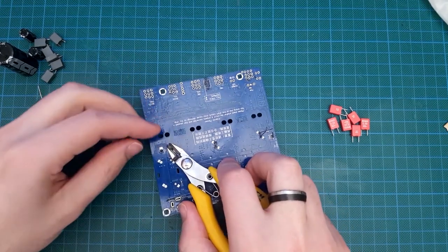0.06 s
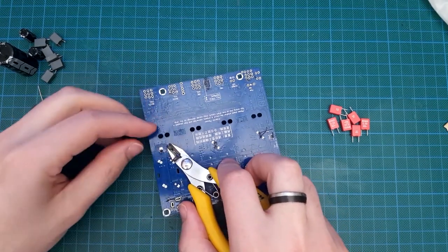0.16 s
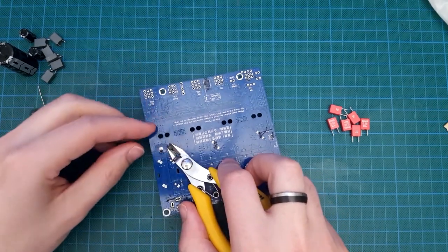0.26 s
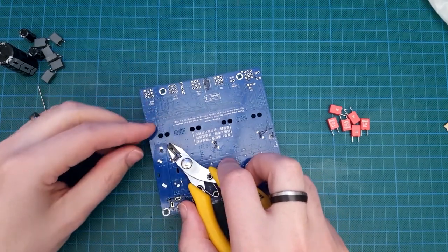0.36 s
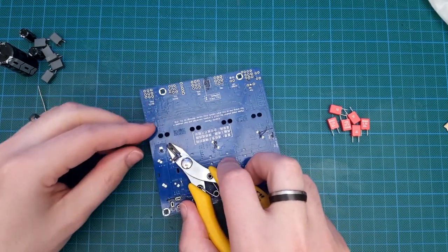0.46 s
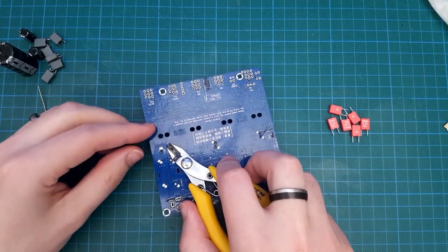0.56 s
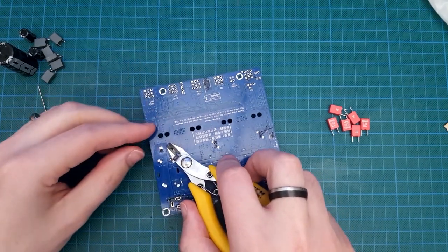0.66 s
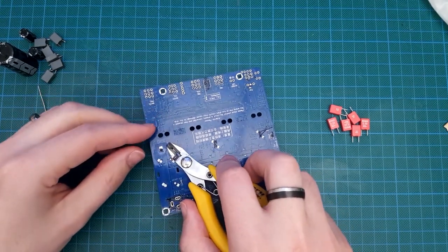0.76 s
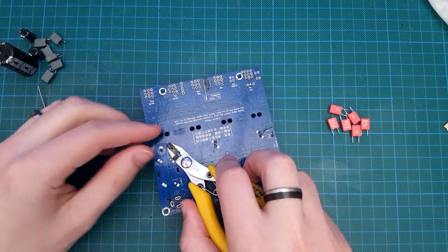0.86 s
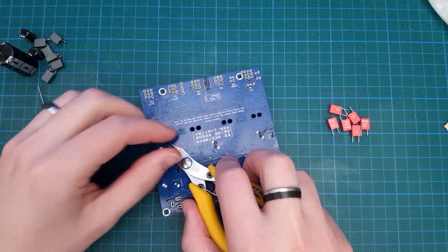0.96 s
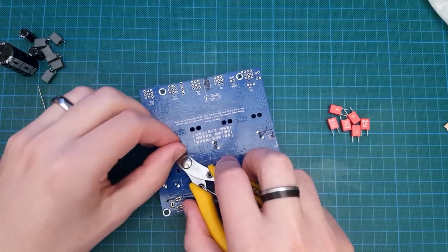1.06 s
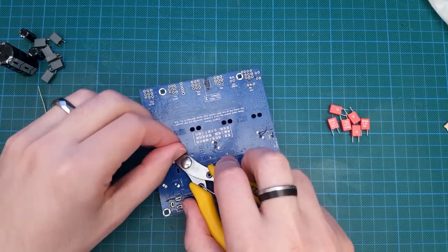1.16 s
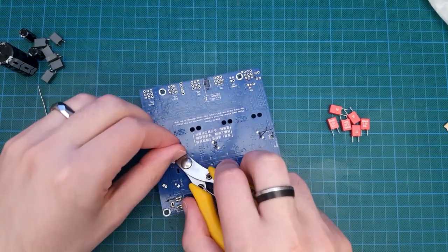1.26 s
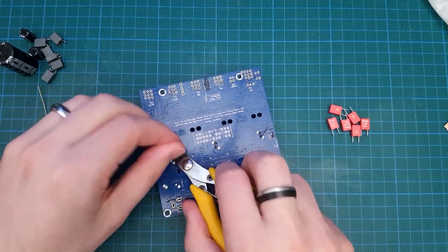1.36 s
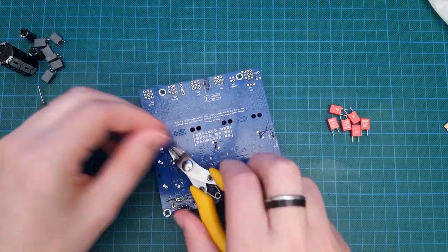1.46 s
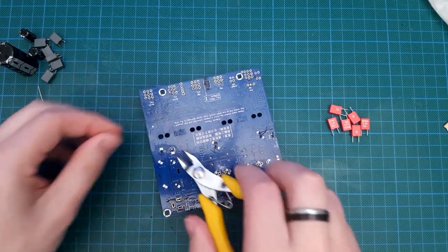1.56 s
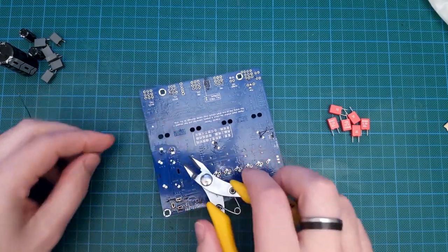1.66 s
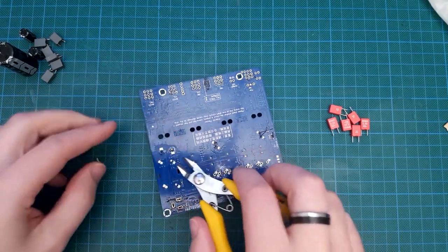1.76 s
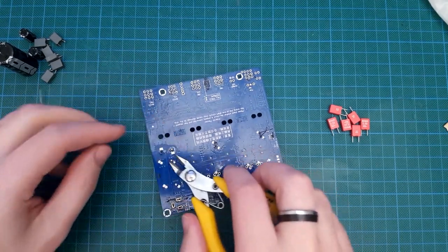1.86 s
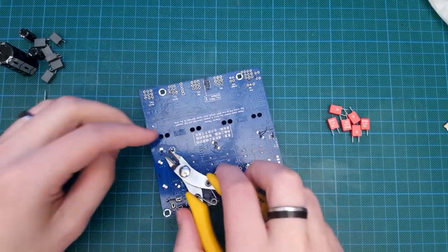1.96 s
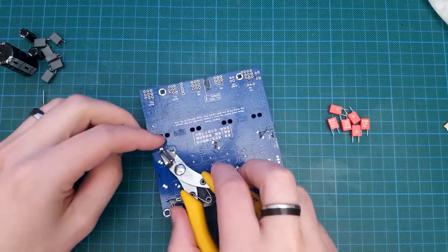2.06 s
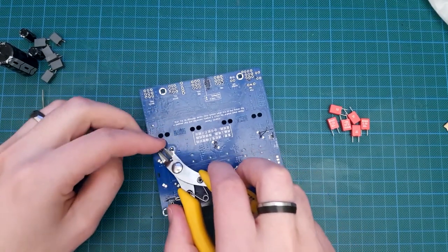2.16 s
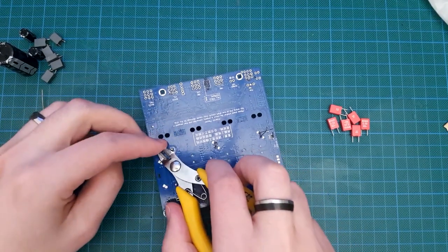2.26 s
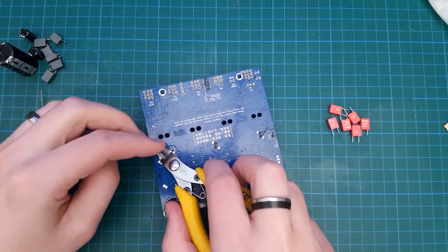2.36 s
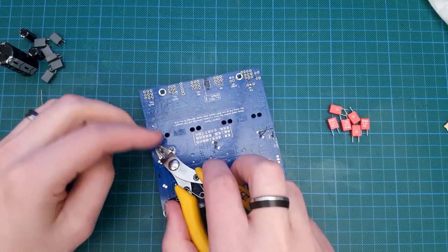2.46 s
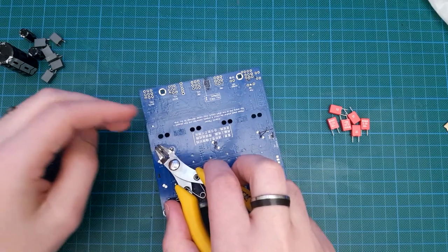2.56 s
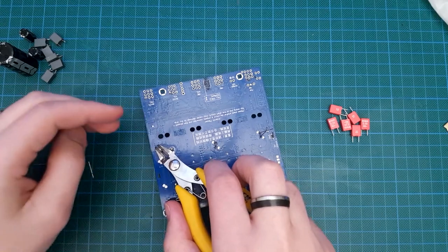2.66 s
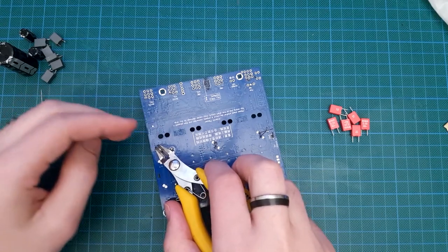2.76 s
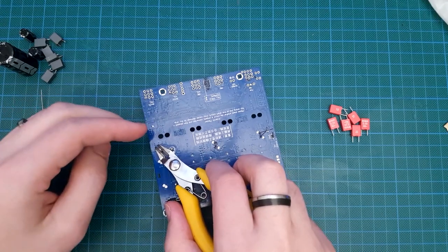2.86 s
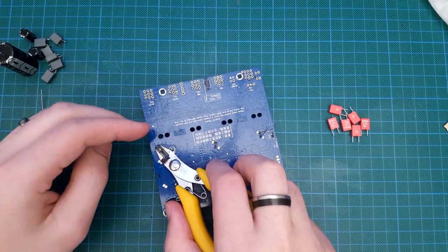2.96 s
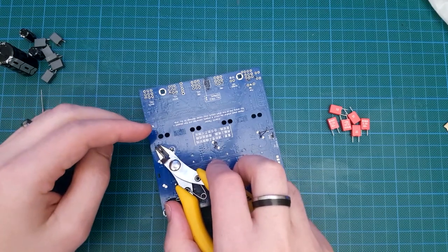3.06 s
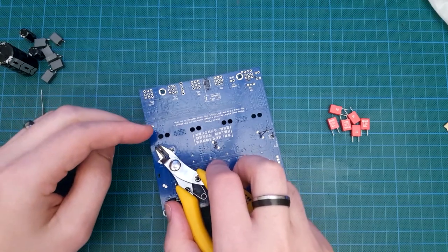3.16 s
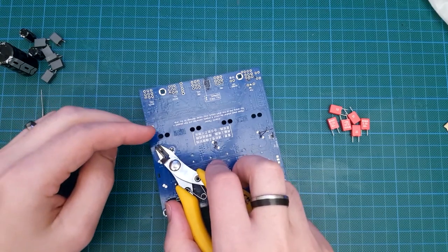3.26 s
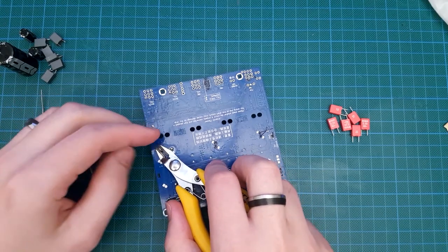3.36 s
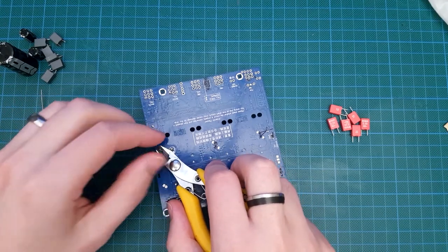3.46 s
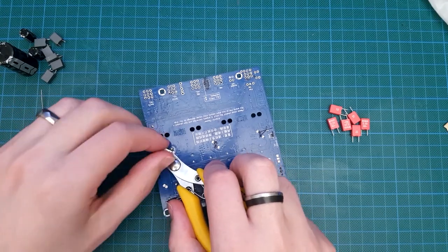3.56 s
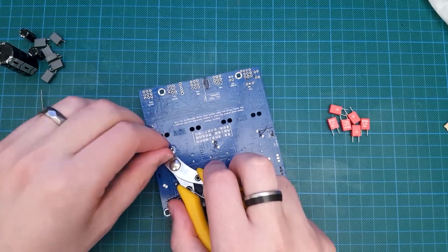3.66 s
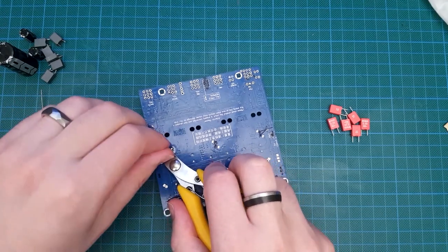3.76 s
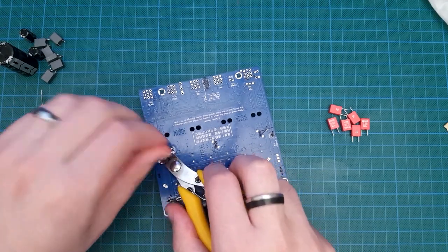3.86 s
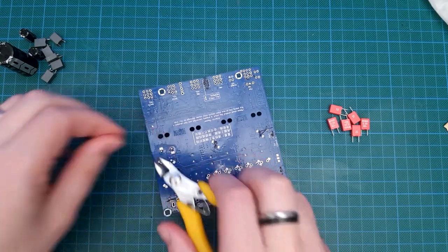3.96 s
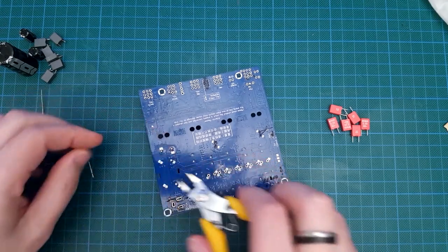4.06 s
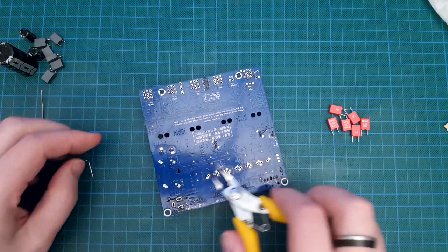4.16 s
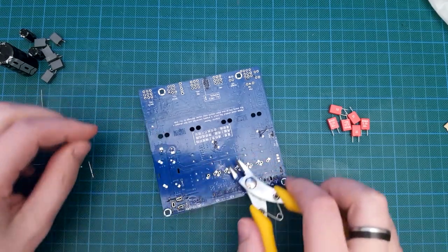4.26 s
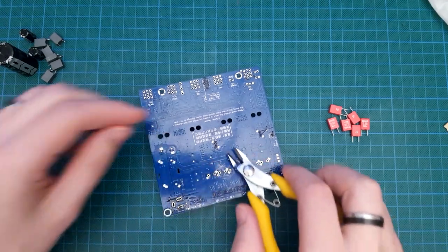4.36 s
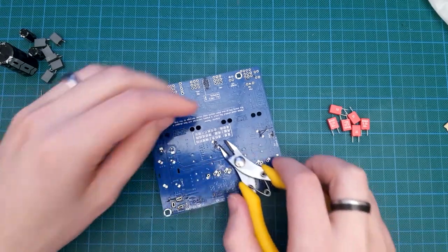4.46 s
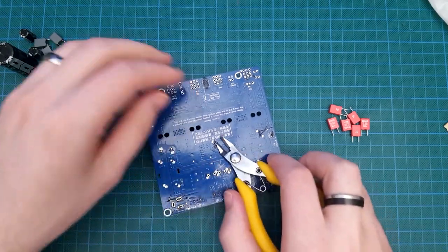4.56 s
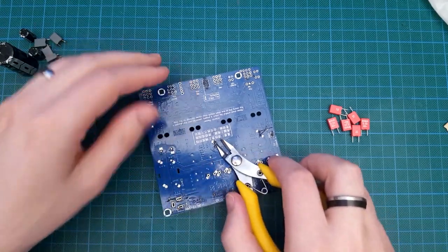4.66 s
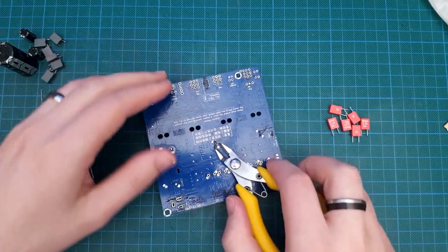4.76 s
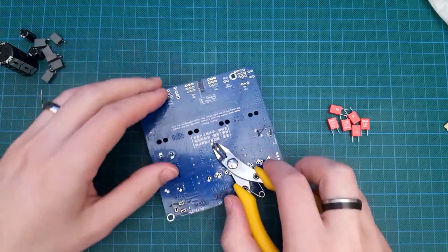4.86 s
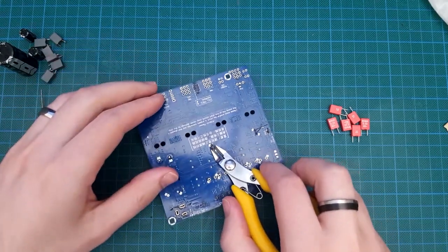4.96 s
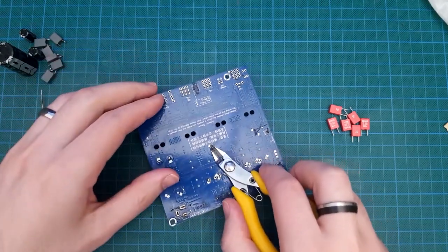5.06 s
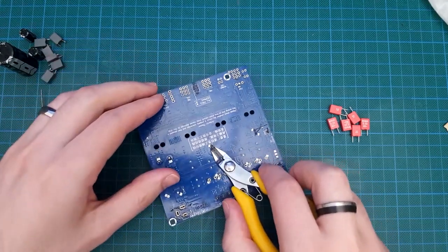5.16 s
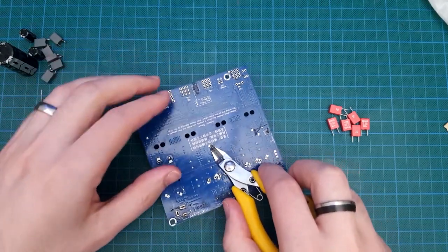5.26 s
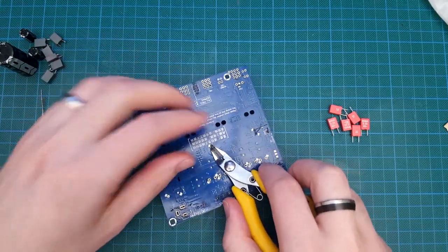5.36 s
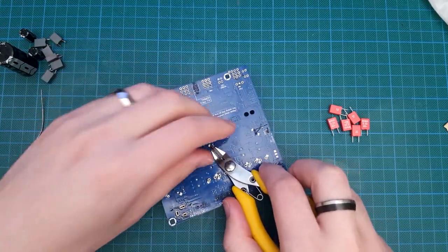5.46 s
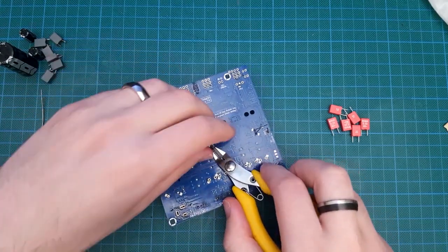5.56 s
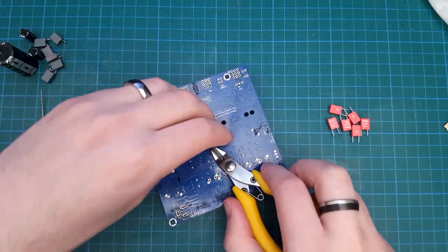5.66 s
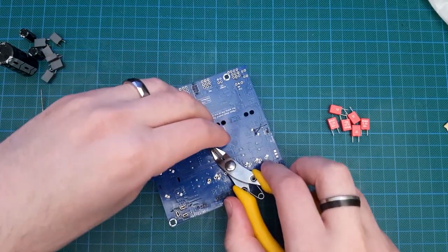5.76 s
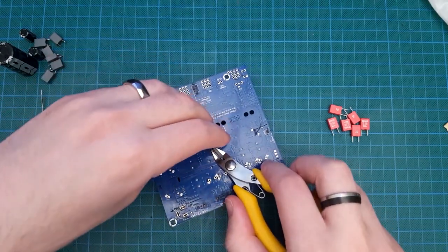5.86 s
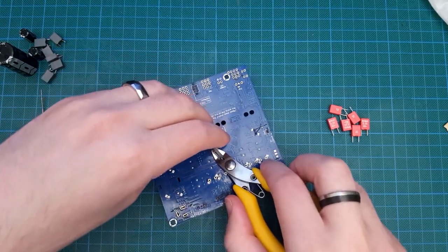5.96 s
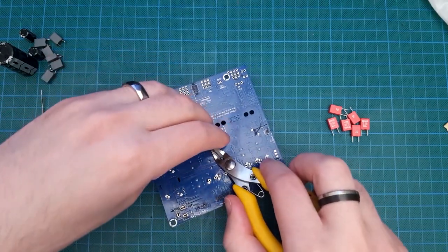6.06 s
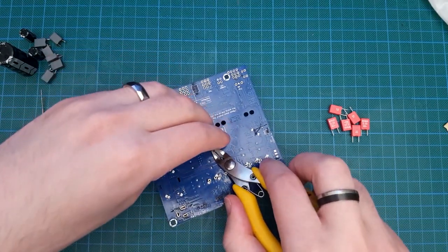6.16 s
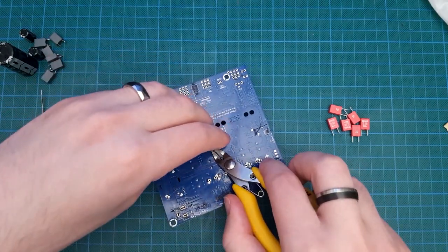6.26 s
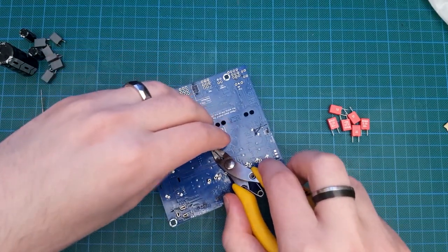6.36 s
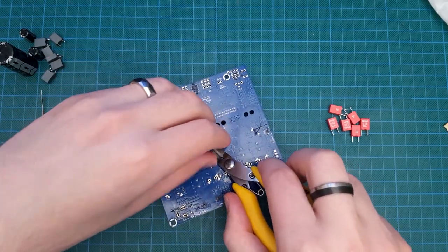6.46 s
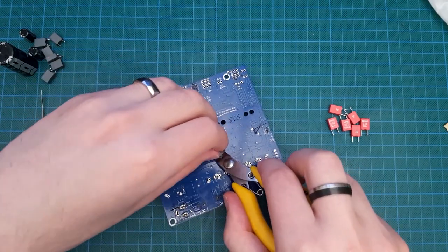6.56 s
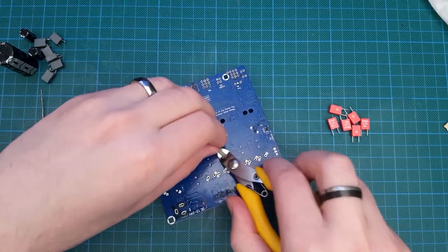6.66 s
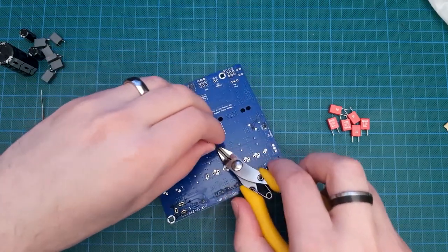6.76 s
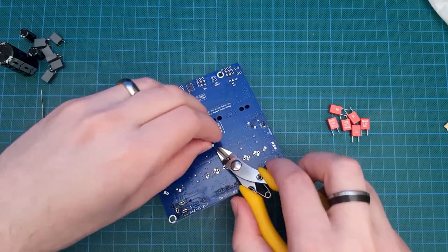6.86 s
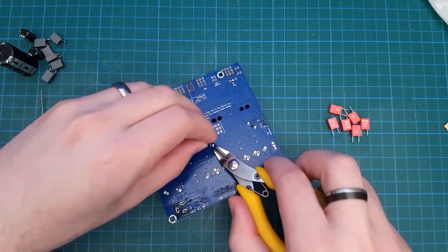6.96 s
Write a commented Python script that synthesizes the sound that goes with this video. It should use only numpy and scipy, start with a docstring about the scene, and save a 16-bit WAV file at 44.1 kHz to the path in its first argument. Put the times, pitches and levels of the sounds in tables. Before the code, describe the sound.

Three hard metallic snaps of small cutters through component leads, with light knocks, ticks and brief rattles between, over faint room rumble and hiss.

```python
"""Three hard snaps with knocks, ticks and brief rattles between them: flush cutters snip component leads off a
circuit board on a workbench in a small room, over a low rumble and a faint hiss.
Blows sum damped modes of bench, board, jaws and touched spot with a noise burst; snaps add a dense noise tail.
Rattles and scrapes are runs of tiny blows; the room is decaying band noise, rumble and hiss are coloured noise."""
import sys
import numpy as np
from scipy import signal
from scipy.fft import rfft, irfft
from scipy.io import wavfile

SR = 44100
rng = np.random.default_rng(int(sys.argv[2]) if len(sys.argv) > 2 else 0)


def persist_wave(psi):
    """Save psi, clipped to +-1, as 16-bit WAV."""
    counts = np.round(np.clip(psi, -1, 1) * 32767).astype(np.int16)
    wavfile.write(sys.argv[1], SR, np.atleast_2d(counts).T)


N = 309141
HIT_SAMPLES = 2048   # length of one blow
SPOT_WIDTH_HZ = 240   # resonance width of the touched spot, damped by fingers


def from_db(db):
    """Decibels to gain."""
    return 10 ** (np.asarray(db) / 20)


def unit(x):
    """Scale to energy 1 per channel."""
    return x / np.sqrt(np.sum(x ** 2, axis=-1, keepdims=True) + 1e-20)


def pan(left_minus_right_db):
    """Left and right gains for a level difference."""
    return from_db(np.array([[left_minus_right_db], [-left_minus_right_db]]) / 2)


def at_hz(points, hz):
    """Read a table on a log-frequency axis."""
    f_hz, value = np.transpose(points)
    return np.interp(np.log(np.maximum(hz, 1)), np.log(f_hz), value)


def in_time(rows):
    """Read a curve at every sample."""
    return np.interp(np.arange(N) / SR, *np.transpose(rows))


def coloured(x, spectrum):
    """Filter a noise by a spectrum table."""
    size = x.shape[-1]
    bins_hz = np.arange(size // 2 + 1) * SR / size
    return irfft(rfft(x) * from_db(at_hz(spectrum, bins_hz)), size)


def high_pass(x, hz):
    """Second-order bass cut."""
    return signal.sosfilt(signal.butter(2, hz, "high", fs=SR, output="sos"), x)


def stereo(shared, opposed, likeness):
    """Left and right from two noises; likeness is their correlation."""
    return np.sqrt(1 + likeness) * shared + np.sqrt(1 - likeness) * opposed * [[1], [-1]]


def add(out, s, sound):
    """Mix a short sound in at a time."""
    at = int(np.clip(s * SR, 0, N - 1))
    out[:, at:at + sound.shape[1]] += sound[:, :N - at]


def background(spectrum, level_db, likeness):
    """Coloured noise with a slow level curve, partly shared by the two channels."""
    mid, side = unit(coloured(rng.standard_normal((2, N)), spectrum)) * np.sqrt(N / 2)
    return from_db(in_time(level_db)) * stereo(mid, side, likeness)


def room_rumble():
    """Low noise, nearly alike in both channels, with a drifting level."""
    # t/s, level/dB before the layer gain
    rumble_level = [(0.0, -65), (0.58, -63.5), (2.73, -68), (3.81, -64), (4.71, -75.5), (5.04, -78),
                    (5.46, -73), (5.78, -67.5), (7.01, -63.5)]
    # f/Hz, spectral density/dB
    rumble_spectrum = [(20, -31), (55, -26.5), (70, -15), (88, -5), (130, -0.5), (200, 2), (280, -0.5),
                       (380, -14), (700, -16), (1500, -54)]
    return from_db(1.5) * pan(1.8) * background(rumble_spectrum, rumble_level, likeness=.92)


def faint_hiss():
    """Wider noise with a slightly drifting level."""
    # t/s, level/dB before the layer gain
    hiss_level = [(0, -69), (1.2, -69), (2.6, -72), (4.2, -70.5), (7.0, -71.5)]
    # f/Hz, spectral density/dB
    hiss_spectrum = [(150, -12.5), (400, 4.5), (700, 2), (1100, -4), (2000, -7), (4000, -18.5), (8000, -28),
                     (11000, -24.5), (15000, -20.5)]
    return from_db(-0.95) * pan(0.43) * background(hiss_spectrum, hiss_level, likeness=.55)


def room(x, build_s):
    """Diffuse reflections reach both channels from both sides, build up quickly and die band by band."""
    # spectral density of the reflections: f/Hz, level/dB
    room_level = [(200, -4.5), (700, 0.5), (1300, -5.5), (2000, -11), (3200, -8), (5000, -7.5), (9000, -4),
                  (16000, -7.5)]
    # decay: f/Hz, T60/s
    room_t60 = [(300, 0.13), (1200, 0.2), (3000, 0.2), (6000, 0.34), (10000, 0.21), (16000, 0.32)]
    # f/Hz, left minus right/dB
    room_pan = [(600, -1), (2000, 0), (4000, 4.5), (8000, -2), (14000, -3.5)]
    # f/Hz, left-right correlation
    room_likeness = [(300, .7), (700, 0.3), (2000, 0), (4000, .1), (10000, 0)]
    t = np.arange(SR // 2) / SR
    build = 1 - np.exp(-(t / build_s) ** 2)
    edges_hz = np.geomspace(150, 18000, 15)
    tail = 0
    for low, high in zip(edges_hz, edges_hz[1:]):
        hz = np.sqrt(low * high)
        band = signal.butter(2, [low, high], "band", fs=SR, output="sos")
        noise = signal.sosfilt(band, rng.standard_normal((2, 2, len(t))))
        noise = stereo(noise[:, :1], noise[:, 1:], at_hz(room_likeness, hz))   # input side, channel, time
        fade = from_db(-60 * t / at_hz(room_t60, hz)) * build
        gain = np.sqrt((high - low) / SR) * from_db(at_hz(room_level, hz))
        tail = tail + unit(noise * fade) * gain * pan(at_hz(room_pan, hz))
    return signal.fftconvolve(x[:, None], tail, axes=-1).sum(axis=0)[:, :N]


def ring(modes, detune, phase_spread, rise_s, lead_s=0, size=HIT_SAMPLES):
    """Damped modes; the point of contact and the grip change their strength and pitch from blow to blow."""
    t = np.arange(size) / SR
    rise = 1 - np.exp(-(t / rise_s) ** 2)   # the force takes a moment to build
    out = 0
    for hz, width_hz, db in modes:
        strength, stretch, left, right = rng.standard_normal(4)
        channel_t = t + [[0], [lead_s]]   # right channel leads
        phase = 2 * np.pi * hz * (1 + detune * stretch) * channel_t
        phase = phase + phase_spread * np.array([[left], [right]])
        mode = unit(np.sin(phase) * rise * np.exp(-np.pi * width_hz * t))
        # neighbouring modes swing in opposite directions
        out = from_db(db + 2 * strength) * mode - out
    return out


def contact(hz, thud_db, clack_db, clink_db, crack_db, ring_db, ring_width_hz, crack_s, rebound):
    """One blow: bench, board, jaws and the touched spot ring under a burst of noise; the tool rebounds once."""
    # resonances: f/Hz, width/Hz, level/dB
    bench_modes = [(370, 260, -9), (446, 330, -1), (564, 30, -7), (626, 59, -1), (777, 47, -4.5),
                   (879, 30.7, -2.5), (1025, 340, -4.5)]
    board_modes = [(1328, 160, -5.5), (1600, 370, -11), (1846, 84, 0.5), (1943, 84, 0), (2220, 67, -1.5)]
    jaw_modes = [(3060, 430, 2), (3570, 970, 4.5), (4000, 1600, -7.5), (4350, 240, -4.5), (4980, 520, -4)]
    # colour of the fracture: f/Hz, spectral density/dB
    crack_spectrum = [(3500, -23.5), (5500, 0), (7000, -3.5), (8000, -3.5), (9400, 0.5), (11000, -1),
                      (13000, -4.5), (16000, -8.5)]
    thud = ring(bench_modes, detune=.008, phase_spread=.3, rise_s=.001)
    clack = ring(board_modes, detune=.015, phase_spread=.25, rise_s=.0005, lead_s=3.6e-5)
    clink = ring(jaw_modes, detune=.02, phase_spread=1.3, rise_s=.0004)
    spot = ring([(hz, ring_width_hz, 0)], detune=0, phase_spread=.2, rise_s=.0005, lead_s=3.6e-5)
    t = np.arange(HIT_SAMPLES) / SR
    burst = (1 - np.exp(-t / 0.0005)) * np.exp(-t / crack_s)
    crack = coloured(rng.standard_normal((2, HIT_SAMPLES)), crack_spectrum) * burst

    parts = np.array([clack, clink, spot, crack])
    lag = int(SR * rng.uniform(.0024, 0.0044))
    second = np.pad(parts, ((0, 0), (0, 0), (lag, 0)))[..., :HIT_SAMPLES]
    parts = unit(parts + rebound * second)
    spot_db = max(clack_db, clink_db) + ring_db
    gains = [from_db(clack_db) * pan(3), from_db(clink_db) * pan(11.5),
             from_db(spot_db) * pan(3), from_db(crack_db) * pan(-7.5)]
    # the small board and jaws radiate little bass
    bright = high_pass(sum(parts * np.array(gains)), hz=1099.0)
    return bright + from_db(thud_db) * pan(-3) * high_pass(unit(thud), hz=260)


def jaw_rings():
    """Released by the grip, the hardened steel sings faintly for a moment."""
    # t/s, level/dB before the layer gain
    release_rows = [(3.718, -36), (4.83, -50.5), (6.838, -25.5), (6.978, -63.5)]
    # steel modes: f/Hz, width/Hz, level/dB
    steel_modes = [(2960, 12, -7), (4300, 21, -1.5), (5172, 21.5, -9.5), (8570, 12.7, -8), (11500, 23, -10)]
    out = np.zeros((2, N))
    for s, db in release_rows:
        song = ring(steel_modes, detune=0.0014, phase_spread=0.9, rise_s=.001, size=SR // 4)
        add(out, s, from_db(db + 4.5) * song)
    return out


def rattle(start, end, per_s, hz, fade_db, clack_db, clink_db, crack_db, ring_db):
    """An uneven run of tiny ticks that fades or swells as it goes."""
    out = np.zeros((2, N))
    for s in np.arange(start, end, 1 / per_s):
        late, stretch, force = rng.uniform(-1, 1, 3)
        tick = contact(hz * (1 + .08 * stretch), clack_db - 27, clack_db, clink_db, crack_db,
                       ring_db=ring_db, ring_width_hz=SPOT_WIDTH_HZ, crack_s=.003, rebound=.6)
        tick_db = 3.7 * force - fade_db * (s - start) / (end - start)
        add(out, s + 0.69 * late / per_s, from_db(tick_db) * tick)
    return out


def scrapes():
    """The jaws stick and slip over the solder joints, swelling as they go."""
    # start/s, end/s, mean slip rate/Hz, ring f/Hz, level/dB
    scrape_rows = [(1.588, 1.616, 390, 3560, -56), (1.997, 2.15, 90, 3440, -62.5),
                   (6.606, 6.640, 130, 2020, -38)]
    out = np.zeros((2, N))
    for start, end, per_s, hz, db in scrape_rows:
        out += from_db(db) * rattle(start, end, per_s, hz, fade_db=-6,
                                    clack_db=3, clink_db=-4, crack_db=-20, ring_db=6.5)
    return out


def drops(count=4):
    """A clipped lead lands on the bench in ever shorter, weaker hops while a fading rattle rolls to rest."""
    # t/s, level/dB before layer gains, first hop/s, roll duration/s
    drop_rows = [(1.728, -31.5, .0475, .2), (4.138, -34, .0225, .085)]
    hop_share, hop_loss_db = 0.51, 7.5   # each hop against the one before
    roll_hz, roll_per_s = 2970, 130
    out = np.zeros((2, N))
    for s, db, hop_s, rest_s in drop_rows:
        roll = rattle(s, s + rest_s, roll_per_s, roll_hz, fade_db=7,
                      clack_db=-9, clink_db=3, crack_db=-22, ring_db=1.5)
        out += from_db(db - 12) * roll
        for k in range(count):
            landing = contact(roll_hz, thud_db=-49, clack_db=-19.5, clink_db=-10, crack_db=-13.5,
                              ring_db=-5.5, ring_width_hz=SPOT_WIDTH_HZ, crack_s=0.0039, rebound=0.57)
            add(out, s, from_db(db - hop_loss_db * k + 18.5) * landing)
            s = s + hop_s * hop_share ** k
    return out


def ticks():
    """The jaw tips feel for the next lead: light, bright touches."""
    # t/s, level/dB before the layer gain, ring f/Hz
    tick_rows = [(0.0483, -58, 3070), (0.329, -66, 4400), (0.922, -57.5, 2170), (1.603, -42.5, 2560),
                 (1.7121, -40.5, 2360), (4.4723, -45, 2820), (4.6564, -58, 4380), (6.7032, -29, 2300),
                 (6.978, -45, 4310)]
    out = np.zeros((2, N))
    for s, db, hz in tick_rows:
        touch = contact(hz, thud_db=-29.5, clack_db=-14, clink_db=-12, crack_db=-18,
                        ring_db=4.0, ring_width_hz=81, crack_s=0.0052, rebound=.6)
        add(out, s, from_db(db + 19) * touch)
    return out


def knocks():
    """The tool is set down on the board; each knock has its own share of low thud and bright crack."""
    # t/s, level/dB before the layer gain, touched spot f/Hz, relative thud/dB, relative crack/dB
    knock_rows = [(1.3503, -25.5, 1960, -35, -29), (1.3829, -23, 2040, -41, -50),
                  (1.4048, -34.5, 1800, -35, -48), (2.0727, -30, 2070, -17, -39),
                  (2.162, -22, 2080, -23.5, -28.5), (2.1991, -39, 1840, -29, -42),
                  (2.2625, -48, 1970, -25, -35), (4.4896, -12.5, 2436, -37.5, -24.5),
                  (4.7272, -18, 2460, -40.5, -28.5), (4.8307, -38, 1304, -30, -27),
                  (5.4272, -46, 1660, -14, -33), (6.5913, -33.5, 1980, -32, -38),
                  (6.6465, -15, 2110, -33, -27), (6.837, -11.5, 2300, -33, -29.5)]
    out = np.zeros((2, N))
    for s, db, hz, thud_db, crack_db in knock_rows:
        blow = contact(hz, thud_db, clack_db=-10.5, clink_db=-20, crack_db=crack_db,
                       ring_db=0.0, ring_width_hz=SPOT_WIDTH_HZ, crack_s=0.0034, rebound=0.43)
        add(out, s, from_db(db + 17) * blow)
    return out


def shiver(t60):
    """A hard snap shakes the whole board and its parts: resonances so dense that they merge into noise."""
    # f/Hz, spectral density/dB
    shiver_spectrum = [(200, -26), (400, -2.5), (750, 0.5), (1100, -3.5), (1800, -3), (3200, 1),
                       (6500, -8.5), (10000, -3), (16000, -6.5)]
    t = np.arange(SR // 3) / SR
    fade = (1 - np.exp(-t / 0.00082)) * from_db(-60 * t / t60)
    return unit(coloured(rng.standard_normal((2, len(t))), shiver_spectrum) * fade)


def snips():
    """A lead starts to tear, gives way, and the jaws slam shut; a sharper crack makes the board shiver more."""
    # t/s, level/dB before part gains, main ring f/Hz, bench knock f/Hz,
    # then relative bench thud/dB, board clack/dB, jaw clink/dB, steel crack/dB
    snip_rows = [(1.2293, -6, 1878, 454, -33, -7.5, -16.5, -23),
                 (3.717, -4.5, 2010, 648, -24, -12.5, -13.5, -11),
                 (6.4812, -9.5, 2300, 595, -31.5, -12.5, -15.5, -18.5)]
    out = np.zeros((2, N))
    for s, db, hz, knock_hz, thud_db, clack_db, clink_db, crack_db in snip_rows:
        tear = contact(hz, thud_db, clack_db, clink_db, crack_db,
                       ring_db=-5.5, ring_width_hz=350, crack_s=.002, rebound=.3)
        blow = contact(hz, thud_db - 0.5, clack_db, clink_db, crack_db,
                       ring_db=-3, ring_width_hz=370, crack_s=.0014, rebound=.35)
        # the board kicks the bench at a different place for each lead
        knock = ring([(knock_hz, 110, 0)], detune=0, phase_spread=0.69, rise_s=.001)
        add(out, s - .003, from_db(db - 7.5) * tear)
        add(out, s, from_db(db + 24.0) * blow)
        add(out, s, from_db(db - 7.5) * high_pass(knock, hz=263))
        add(out, s, from_db(db + crack_db + 20) * shiver(t60=0.23))
    return out


def scene():
    """The cutters close by, the room around them."""
    underneath = room_rumble() + faint_hiss()
    handling = jaw_rings() + scrapes() + drops() + ticks() + knocks()
    cuts = snips()
    reflections = room(from_db(-1.0) * cuts + from_db(-2) * handling, build_s=0.0071)
    return cuts + handling + reflections + underneath


def record(dry):
    """The highest peaks are rounded, the deep bass and the top are cut."""
    rounded = high_pass(np.tanh(dry), hz=65)
    top_cut = signal.ellip(10, .2, 70, 16100, fs=SR, output="sos")   # ripple/dB, stopband/dB, cutoff/Hz
    return signal.sosfilt(top_cut, rounded)


dry = scene()
out = record(dry)
persist_wave(out)
```